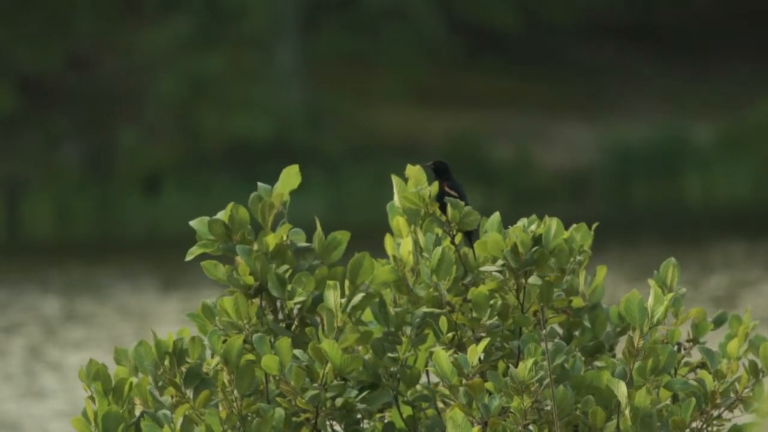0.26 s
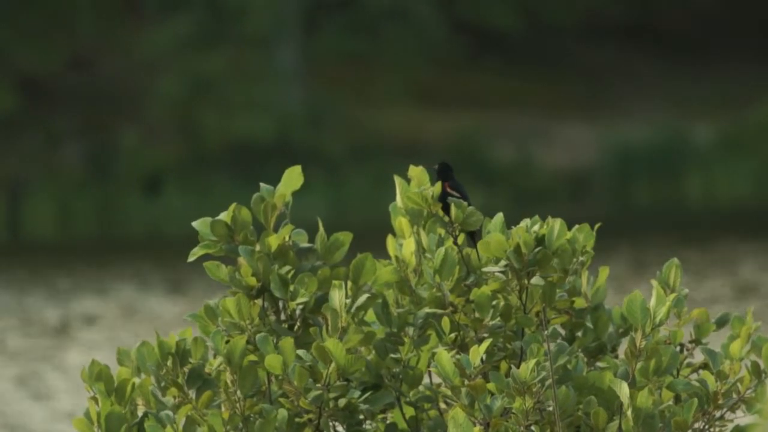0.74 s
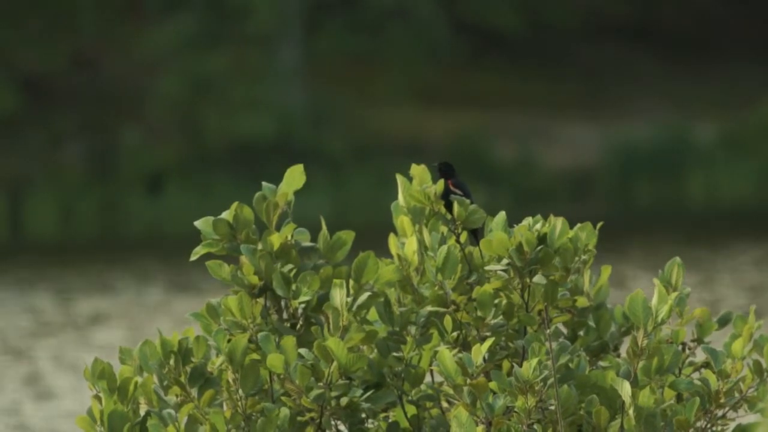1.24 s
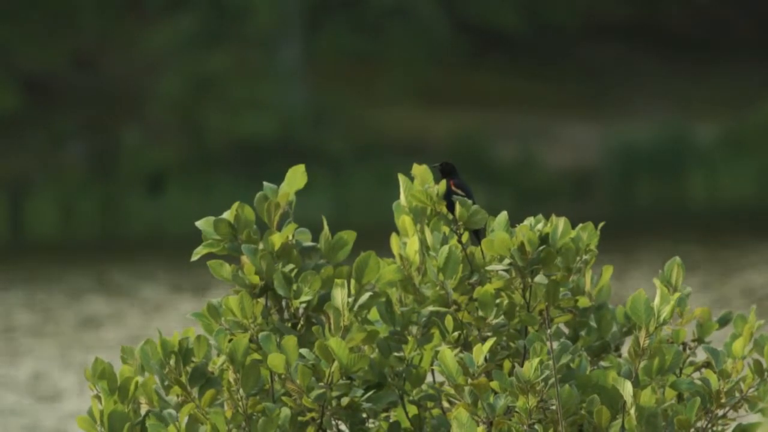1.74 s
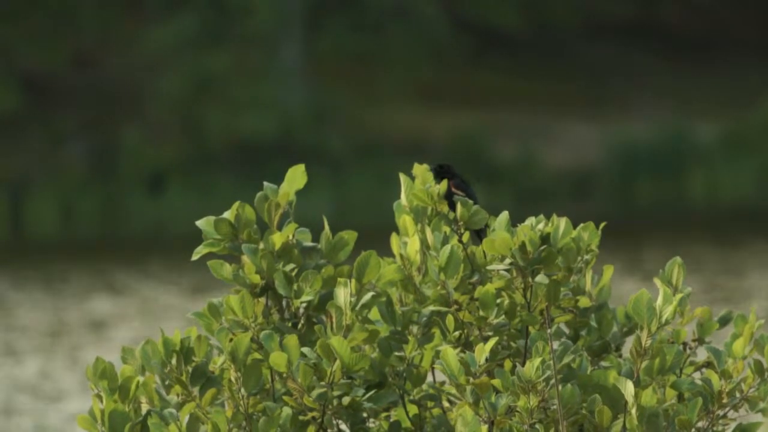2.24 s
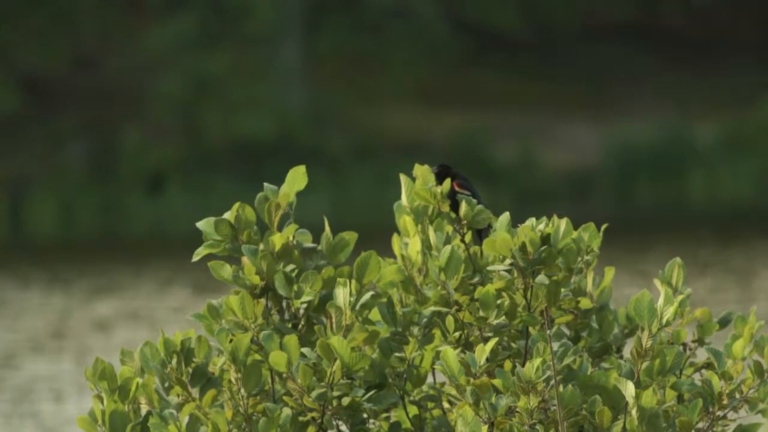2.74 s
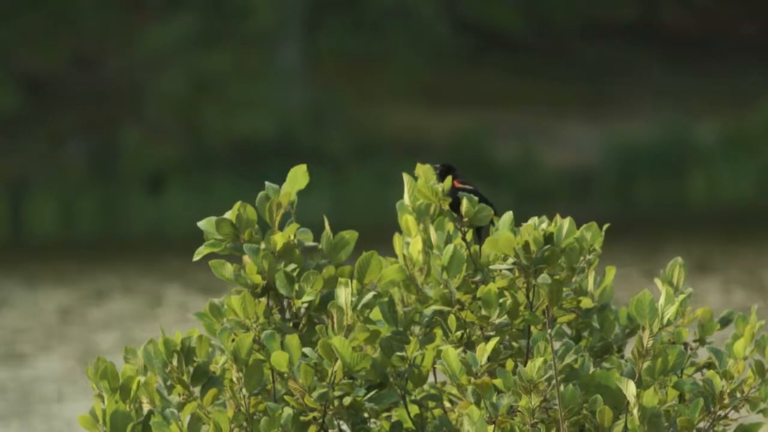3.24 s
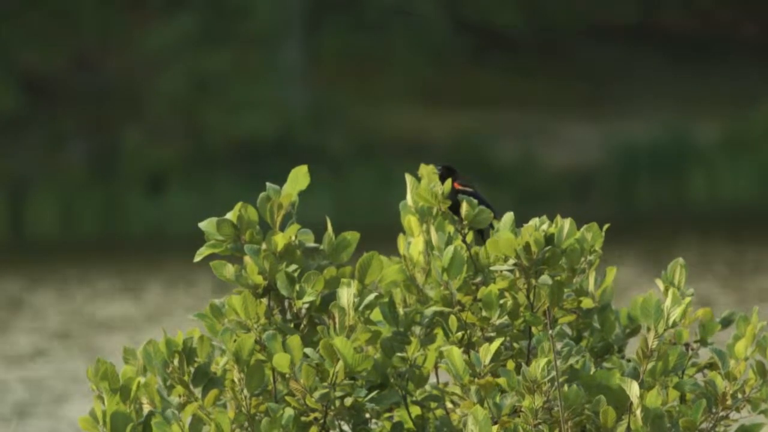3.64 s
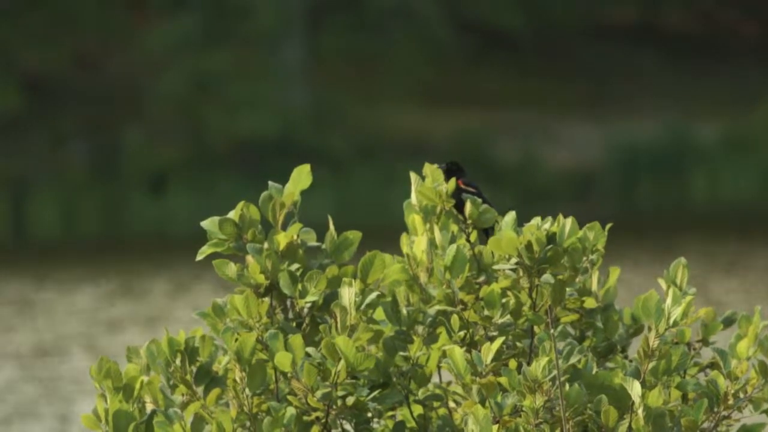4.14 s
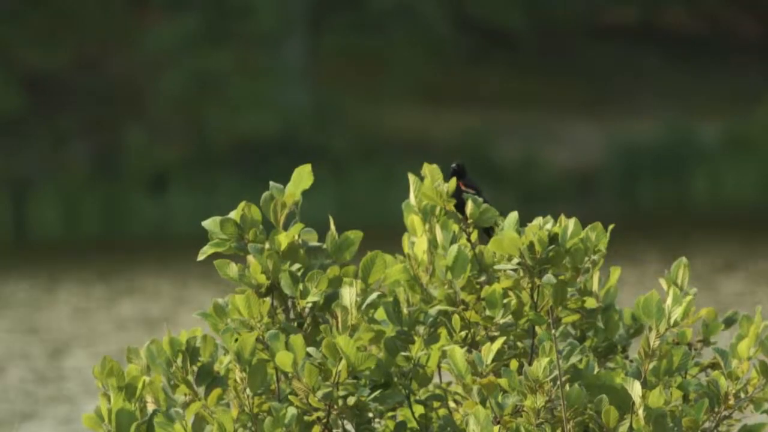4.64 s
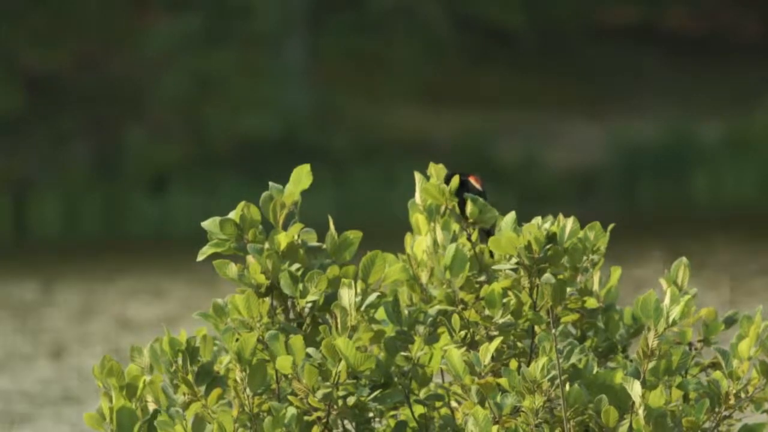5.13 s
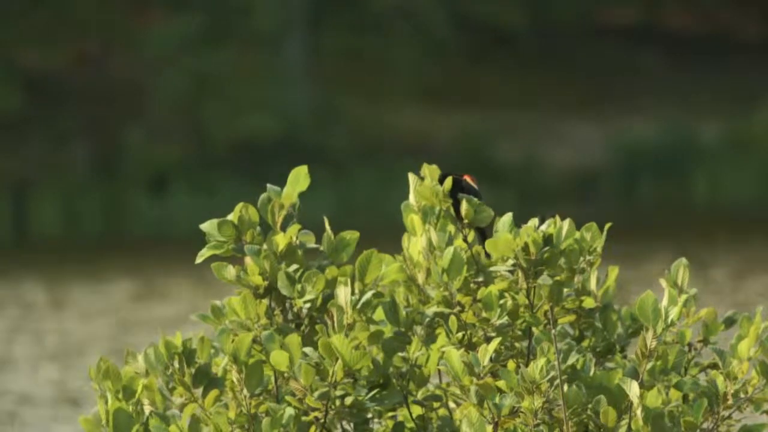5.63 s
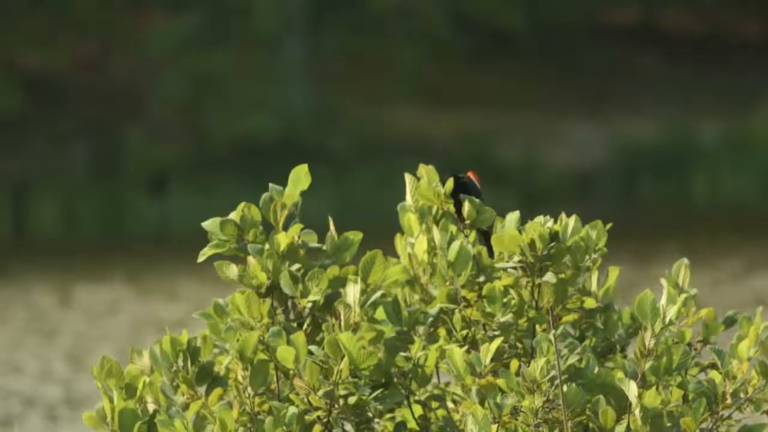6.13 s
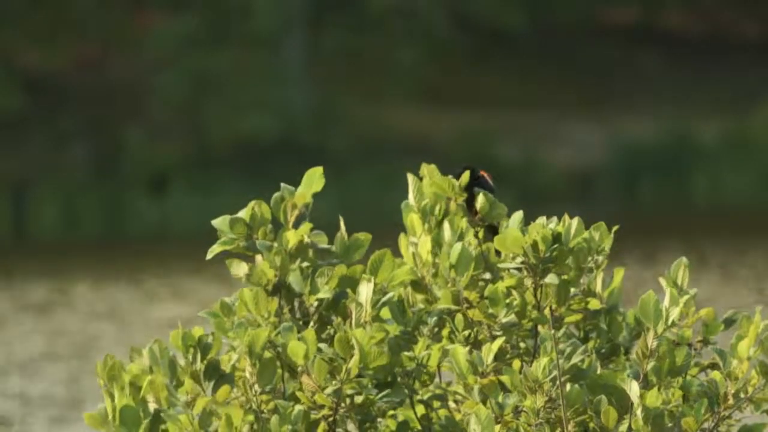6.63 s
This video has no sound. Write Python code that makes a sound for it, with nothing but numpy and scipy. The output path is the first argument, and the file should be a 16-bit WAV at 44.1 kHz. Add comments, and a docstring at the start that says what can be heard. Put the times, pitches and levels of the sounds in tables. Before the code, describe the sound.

A quiet pond with a steady shrill insect haze and a faint engine hum dying away. After a far, blurred rival song, one blackbird in a nearby bush sings low-to-high liquid whistles and leaps into a bright, buzzing trill lasting under a second. Woods and water echo it faintly. Then come low frog gulps, husky distant chips and thin whistles over soft air. The microphone catches the main song centrally, with a faint electronic whine.

```python
"""A red-winged blackbird on a bush by a pond sings a few rising whistles and a long buzzing trill; the far shore echoes.
Its song is a sum of gliding sines with beat-rate modulation of pitch and level, plus filtered noise.
A rival and small birds call in the distance as sines and noise; a frog gulps three times as coloured harmonics.
Insects hiss as shaped noise, and a far engine of low tones and rumble fades away unevenly.
The camera adds a thin whine of steady high tones."""
import sys
import numpy as np
from scipy import signal
from scipy.fft import rfft, irfft, next_fast_len
from scipy.io import wavfile
from scipy.ndimage import map_coordinates

SR = 44100
rng = np.random.default_rng(int(sys.argv[2]) if len(sys.argv) > 2 else 0)


def materialize(psi):
    """Save the field psi as 16-bit PCM at rate SR to the path in sys.argv[1].

    A 1-D psi becomes a single channel; in a 2-D psi each row is a channel.
    """
    bounded = np.clip(np.atleast_2d(psi).T, -1, 1)
    quanta = np.round(bounded * 32767).astype(np.int16)
    wavfile.write(sys.argv[1], SR, quanta)


N = 303441
TIME = np.arange(N) / SR
TRILL_START_S, TRILL_END_S = 3.03, 3.681  # the near bird's trill: first full beat, last sound


def amp(db):
    """Amplitude ratio of a level: a factor of ten for every 20 dB."""
    return 10 ** (np.asarray(db) / 20)


def unit(x):
    """Normalisation to a root mean square of 1."""
    return x / np.sqrt(np.mean(x ** 2) + 1e-20)


def along(points, hz):
    """Interpolation of (f/Hz, value) points on a logarithmic frequency axis."""
    f, v = np.transpose(points)
    return np.interp(np.log(hz + 1), np.log(f + 1), v)


def curves(rows, at=TIME):
    """Linear interpolation over the first column: one curve for each further column."""
    position, *columns = np.transpose(rows)
    return [np.interp(at, position, column) for column in columns]


def gate(start, end, edge):
    """Raised-cosine window: one between start and end, with soft edges."""
    inside = np.minimum(TIME - start, end - TIME)
    return np.sin(np.pi / 2 * np.clip(inside / edge + .5, 0, 1)) ** 2


def wobble(rate):
    """Band-limited random modulation: a spline through random knots, rate of them a second."""
    knots = rng.standard_normal(int(N * rate / SR) + 4)
    coarse = TIME[::8]  # the spline is evaluated at every eighth sample
    return np.interp(TIME, coarse, map_coordinates(knots, [coarse * rate]))


def tone(hz):
    """Frequency modulation: phase is the integral of the pitch curve; a sine of rms 1."""
    return np.sqrt(2) * np.sin(2 * np.pi * (np.cumsum(hz) / SR + rng.random()))


def filtered(x, response):
    """Linear filtering: the spectrum of x times a complex response of frequency."""
    m = next_fast_len(N + SR)
    return irfft(rfft(x, m) * response(np.fft.rfftfreq(m, 1 / SR)), m)[..., :N]


def noise(spectrum):
    """Spectral shaping of white noise to rms 1, silent far outside the given points."""
    closed = [(spectrum[0][0] / 2, -120), *spectrum, (spectrum[-1][0] * 2, -120)]
    return unit(filtered(rng.standard_normal(N), lambda hz: amp(along(closed, hz))))


def diffuse(spectrum):
    """Diffuse field: independent mid and side noises set the left-right coherence at each frequency."""
    # left-right coherence: [f/Hz, correlation]
    coherence = [(60, 0.88), (130, 0.35), (290, 0.3), (640, -0.3), (1410, -0.44), (3100, -0.075),
                 (6820, -0.59), (15000, 0.39)]

    def turn(hz):
        """Mixing angle: half the arc cosine of the coherence."""
        return np.arccos(np.clip(along(coherence, hz), -1, 1)) / 2

    mid = filtered(noise(spectrum), lambda hz: np.cos(turn(hz)))
    side = filtered(noise(spectrum), lambda hz: np.sin(turn(hz)))
    return np.array([mid + side, mid - side]) / np.std(mid)


def placed(x, left_db, lead_ms):
    """Interaural level and time differences, left over right, split evenly between the ears."""
    ears = np.array([[.5], [-.5]])
    return amp(left_db * ears) * filtered(x, lambda hz: np.exp(2j * np.pi * hz * ears * lead_ms / 1000))


def scatter(x, decay, build):
    """Multiple scattering: a decaying noise response, different in each ear, with build-up constant build/s."""
    hz, t, z = signal.stft(rng.standard_normal((2, SR + SR // 2)), SR, nperseg=256)
    fall = amp(-60 * t / along(decay, hz)[:, None])
    rise = 1 - np.exp(-t / build)
    tail = signal.istft(z * fall * rise, SR, nperseg=256)[1]
    return signal.fftconvolve(x[None], tail / np.linalg.norm(tail[0]), axes=1)[:, :N]


def whistles(notes, waver, scoop_s, swell_db_per_s, fade_db, attack_s, release_s, roundness=1.34):
    """Pure-tone glides: each scoops onto its pitch, swells, then fades ever faster and bends away."""
    out = np.zeros(N)
    for start, length, hz, scoop, bend, db, swell_s in notes:
        span = slice(int(start * SR), int((start + length + release_s / 2) * SR))
        t = np.maximum(TIME[span] - start, 0)
        semitones = scoop * np.exp(-t / scoop_s) + bend * np.minimum(t / length, 1) ** 2
        pitch = hz * 2 ** (semitones / 12) * (1 + waver * wobble(180)[span])
        fading = np.maximum(t - swell_s, 0) / max(length - swell_s, release_s)
        level = db - swell_db_per_s * np.maximum(swell_s - t, 0) - fade_db * fading ** roundness
        edges = np.minimum(t / attack_s, 1) * np.clip((length - t) / release_s + .5, 0, 1)
        out[span] += amp(level) * edges * tone(pitch)
    return out


def pond():
    """Superposed diffuse fields: soft air, slow swells of far traffic and two choruses of insects."""
    # outdoor air: [f/Hz, relative level per hertz/dB]
    air_spectrum = [(76, -56), (130, -13), (215, -12), (392, -4), (551, -3.4), (673, -2.5), (1030, -5.5),
                    (2480, -6.5), (3090, -7.5), (4620, -9), (5310, -4.5), (7470, -13.5), (10700, -17.5),
                    (12800, -14.5), (15700, -21)]
    # shrill insects: [f/Hz, relative level per hertz/dB]
    shrill_spectrum = [(4400, -37), (5050, -5.5), (5400, 0.5), (5900, -5.5), (6800, -18)]
    # a lower, fainter insect chorus: [f/Hz, relative level per hertz/dB]
    chirr_spectrum = [(2700, -20), (3000, -9), (3200, -7), (3400, -11), (3800, -25)]
    # traffic swells: [t/s, half width at 1/e of the peak/s, gain before flutter/dB]
    swells = [(1.1, 0.45, -71.5), (6.12, 0.33, -71)]
    traffic_db = -78  # between the swells
    traffic_spectrum = [(150, -15.5), (220, -1.0), (380, 0), (600, -10.5), (1200, -16)]

    air = amp(-59.0) * diffuse(air_spectrum)
    bumps = sum(amp(db) * np.exp(-((TIME - s) / width) ** 2) for s, width, db in swells)
    passing = amp(traffic_db) + bumps
    traffic = passing * amp(0.69 * wobble(5.4)) * diffuse(traffic_spectrum)
    shrill = amp(-65.5 + 1.06 * wobble(25)) * diffuse(shrill_spectrum)
    chirr_db = np.interp(TIME, [1, 5], [-82, -72])  # this chorus grows
    chirr = amp(chirr_db + 1.4 * wobble(7.2)) * diffuse(chirr_spectrum)
    return air + traffic + shrill + chirr


def engine():
    """Engine orders: a firing line and its neighbours at multiples of shaft rate, over slower-fading rumble."""
    # fading of the far engine: [t/s, firing line level/dB]
    line_levels = [(0.0, -58), (0.07, -56), (0.73, -55.5), (2.24, -75), (2.36, -68), (2.91, -85.5),
                   (3.97, -73.5), (4.06, -79), (5.61, -75.5), (6.11, -84), (6.84, -70.5), (6.88, -74)]
    # running speed: [t/s, firing rate f/Hz]
    revs = [(0, 121.3), (.5, 123), (1.5, 120.3), (4, 120.2), (6.88, 118)]
    rumble_db, rumble_follows = -66, 0.47  # gain when the engine is loudest; share of the fading followed
    overtone_db = -81.5
    exhaust = [(25, -26), (55, -20), (72, -22), (86, 2.5), (105, -14), (170, -10), (260, -20)]

    db, = curves(line_levels)
    fading_db = db - db.max()
    hz, = curves(revs)
    shaft = hz * (1 + .012 * wobble(16)) / 3  # the firing line is the third order
    orders = tone(3 * shaft) + amp(-16) * tone(4 * shaft)
    second_order = tone(2 * shaft * (1 + 0.038 * wobble(12)))
    rumble = amp(-3.5) * second_order + amp(0.5) * noise(exhaust)
    overtone = amp(overtone_db + 2.3 * wobble(3)) * tone(2 * hz)  # does not fade
    return amp(db) * orders + amp(rumble_db + rumble_follows * fading_db) * rumble + overtone


def frog(count=18, rough=0.049):
    """Source and filter: each gulp is a harmonic series that drops in pitch, coloured by the throat."""
    # gulps: [t/s, length/s, settled pitch f/Hz, level/dB, t60/s]
    gulps = [(3.837, 0.065, 173.2, -44.5, .16), (4.091, .088, 207.4, -54.5, 0.66),
             (4.346, 0.04, 188, -57.5, 0.35)]
    # throat resonances: [f/Hz, relative level/dB]
    throat = [(180, -25), (350, 1), (530, -2.5), (620, 2.5), (720, -11), (950, -26), (1900, -13),
              (3000, -11), (4000, -48)]
    attack_s = 0.01
    drop, drop_s = 0.151, .008  # share by which the pitch starts too high; its time constant

    out = np.zeros(N)
    for start, length, pitch, db, t60 in gulps:
        span = slice(int(start * SR), int((start + length) * SR))
        t = TIME[span] - start
        hz = pitch * (1 + drop * np.exp(-t / drop_s))
        gain = np.minimum(t / attack_s, amp(-60 * (t - attack_s) / t60))
        k = np.arange(1, count + 1)[:, None]  # harmonic numbers
        cycles = np.cumsum(hz * (1 + rough * wobble(250)[span])) / SR
        phase = 2 * np.pi * (k * cycles + rng.random((count, 1)) / 2)
        voice = unit(np.sum(amp(along(throat, k * hz)) * np.sin(phase), axis=0))
        out[span] += amp(db) * gain * voice * signal.windows.tukey(len(hz), .1)
    return out


def small_birds():
    """Gliding tones: scattered far whistles and, with more random pitch modulation, one row of husky chips."""
    # far whistles: [t/s, length/s, pitch f/Hz, scoop/semitones, bend/semitones, level before distance/dB, swell/s]
    far_calls = [(.9, .062, 10050, -2.5, 0.5, -62, .042), (1.06, .1, 9170, .6, -.6, -67, .005),
                 (1.27, .09, 1820, -0.5, 0.5, -69.5, .04), (2.795, .075, 14000, 0, -.1, -61, .03),
                 (3.53, .1, 9100, 0, 0.5, -69, .04), (5.62, .2, 4350, -3, -1.8, -52.5, 0.17),
                 (5.88, 0.13, 3315, .5, 0, -64, .09), (6.64, .028, 3600, 1, 8.5, -61, .01),
                 (6.677, 0.0154, 3500, 7.5, -2.5, -61.5, .009), (6.69, 0.22, 3687, 1.3, 0.5, -55.5, 0.12)]
    # one bird's row of chips: [t/s, level before distance/dB]
    chip_row = [(4.422, -57), (4.58, -57.5), (4.745, -59), (4.89, -66)]
    chip_hz, chip_s = 3510, .066

    calls = whistles(far_calls, waver=.004, scoop_s=.025, swell_db_per_s=42, fade_db=3,
                     attack_s=0.0085, release_s=.014)
    chips = [(start, chip_s, chip_hz, -.7, 0, db, .025) for start, db in chip_row]
    return calls + whistles(chips, waver=.022, scoop_s=0.0075, swell_db_per_s=40, fade_db=5,
                            attack_s=0.0031, release_s=.012)


def rival(band_hz=2840, beat_hz=48.1, swing=0.021):
    """Joint frequency and amplitude modulation: short notes, then a pulsing line in a blurred buzz."""
    # buzz: [f/Hz, relative level per hertz/dB]
    buzz_spectrum = [(2300, -38), (2650, -3), (2850, -7.5), (3150, -9), (3600, -0.5), (3950, -7),
                     (4350, -16), (5050, -6), (6000, -37)]
    # opening: [t/s, length/s, pitch f/Hz, scoop/semitones, bend/semitones, level before distance/dB, swell/s]
    opening = [(1.62, .04, 2450, 0, .2, -58.5, .025), (1.675, 0.029, 1647, 1.5, -.7, -54, .021),
               (1.718, 0.013, 3590, 0.16, -.25, -52, .012)]
    start_s, end_s, release_s = 1.74, 2.216, 0.074  # its trill
    start_db, fade_db_per_s = -56.5, 7.5  # before distance
    accent_db, accent_s = 4, 0.036  # it starts with a push

    t = np.maximum(TIME - start_s, 0)
    db = start_db - fade_db_per_s * t + accent_db * np.exp(-t / accent_s)
    edges = gate(start_s, TIME[-1], 0.034) * np.exp(-np.maximum(TIME - end_s, 0) / release_s)
    beat = tone(beat_hz * (1 + .05 * wobble(12)))
    pitch = band_hz * (1 + swing * beat + 0.0122 * wobble(300))
    line = tone(pitch) * unit(amp(2.1 * beat))
    buzz = noise(buzz_spectrum) * unit(amp(-1.1 * beat))  # strongest between the line's pulses
    line_gain = amp(np.interp(TIME, [1.8, 2.0], [-6, -2]))
    song = amp(db) * edges * (line_gain * line + amp(-1.0) * buzz)
    return song + whistles(opening, waver=.012, scoop_s=.011, swell_db_per_s=300, fade_db=4,
                           attack_s=0.0038, release_s=.007)


def sizzle(width_hz=1300):
    """Band-limited noise with exponential decay: a few high spits over a steady trace on the trill."""
    # steady trace: [f/Hz, relative level per hertz/dB]
    trace_spectrum = [(10500, -18), (11600, 6), (12500, -6), (14300, -8), (15800, -6)]
    # high spits as the song peaks: [t/s, centre f/Hz, level/dB, t60/s]
    spits = [(2.962, 11500, -51.5, 0.085), (2.99, 11600, -46, 0.12), (3.012, 13300, -45, 0.12),
             (3.02, 14900, -64, 2.2)]

    out = amp(-69) * gate(TRILL_START_S, TRILL_END_S, .02) * noise(trace_spectrum)
    for start, hz, db, t60 in spits:
        band = noise([(hz - width_hz, -22), (hz, 0), (hz + width_hz, -16)])
        decay = amp(db - 60 * np.abs(TIME - start) / t60)
        out = out + decay * gate(start, TRILL_END_S, .015) * band
    return out


def trill(jitter=.0135, flutter=0.028, slip=.018):
    """Periodic modulation: both sides of the syrinx repeat gestures about 46 times a second and beat together."""
    # course of the trill: [t/s, gain on all voices/dB, drive of the upper partials/dB]
    course = [(3.03, -33.5, -16), (3.038, -30, -11.5), (3.07, -32, -8.5), (3.358, -31.5, -13),
              (3.678, -35, -10)]
    # gestures of one beat, for four voices: [share of the beat, multiple of the voice's pitch, relative level/dB]
    arch_shape = [(0, .99, -15), (.14, .99, -5), (.35, 1.015, -3), (.55, 1.005, 0), (0.719, .985, -5),
                  (.86, .975, -5), (1, .99, -26)]
    under_shape = [(0, 1.05, -7), (.12, 1.04, -21), (0.379, 1.03, -13.5), (0.558, 1.02, -3), (.72, 1, -5.5),
                   (.9, .995, -1), (1, 1.05, -5)]
    flick_shape = [(0, 1.25, -13.5), (.07, 1.2, -5.5), (0.201, 1.08, -16.5), (.5, 1.2, -25),
                   (.76, 1.2, -19), (.88, 1.06, -6), (1, 1.25, -17)]
    squeak_shape = [(0, 1.58, 3), (.1, 1.45, 1), (.24, 1.48, -5), (.36, 1.55, -4.5), (.55, 1.55, -15),
                    (.75, 1.46, -15), (.9, 1.57, -10), (1, 1.58, 0.5)]
    # rasp of the lower voice: [f/Hz, relative level per hertz/dB]
    rasp_spectrum = [(1400, -35), (1900, -15.5), (2450, -6.5), (3500, -4.5), (5000, -7.5), (5800, -20),
                     (7000, -39), (8000, -31), (10000, -30)]
    # colour of the whole trill: [f/Hz, gain/dB]
    beak = [(3000, -0.5), (3700, 2.5), (3930, 4), (4100, -2), (4400, -1), (4630, 2.5), (4930, -3.5),
            (5080, 3.5), (5380, -8), (5700, -1)]
    beat_hz, slowing_hz_per_s = 48.05, 5.6  # beat rate at first; the beat slows a little
    upper_hz, lower_hz, sag_hz_per_s = 3314, 2866, 345  # the two voices sink together
    overshoot_hz, settle_s = 103.9, .07  # the upper voice comes out of the leap too high
    rasp_db = -8  # relative to the lower voice's tone

    db, upper_db = curves(course)
    t = TIME - TRILL_START_S
    beats = beat_hz * t - slowing_hz_per_s * t ** 2 / 2
    high_hz = upper_hz - sag_hz_per_s * t + overshoot_hz * np.exp(-np.maximum(t, 0) / settle_s)
    low_hz = lower_hz - sag_hz_per_s * t

    def gesture(hz, shape, unsteady):
        """Quasi-periodicity: pitch and gain of one voice, no two beats quite alike."""
        ratio, level = curves(shape, (beats + slip * wobble(60)) % 1)
        return hz * ratio * (1 + unsteady * wobble(450)), amp(level + 0.86 * wobble(130))

    # the throat favours the second harmonic of the arching voice; the first and third leak through
    pitch, gain = gesture(high_hz, arch_shape, jitter)
    first = amp(-28.5) * tone(pitch / 2)
    third = amp(upper_db - 3.5) * tone(pitch + pitch / 2)
    arch = gain * (tone(pitch) + first + third)
    # the lower voice rasps as it opens
    pitch, gain = gesture(low_hz, under_shape, jitter * 2.19)
    under = gain * (tone(pitch) + amp(rasp_db) * noise(rasp_spectrum))
    pitch, gain = gesture(high_hz, flick_shape, flutter)
    flick = gain * tone(pitch)
    pitch, gain = gesture(high_hz, squeak_shape, flutter * 0.89)
    squeak = gain * amp(upper_db) * tone(pitch)
    voices = gate(3.023, TRILL_END_S, .01) * amp(db) * (arch + under + flick + squeak)
    return filtered(voices, lambda hz: amp(along(beak, hz)))


def blackbird():
    """Superposition: whistles made husky by amplitude modulation, a leap upward, faint sizzle and the trill."""
    # opening whistles, from both sides of the syrinx:
    # [t/s, length/s, pitch f/Hz, scoop/semitones, bend/semitones, level/dB, swell/s]
    opening_notes = [(2.482, .024, 1150, -.7, 1, -56, .016), (2.507, 0.039, 762, 0, 0, -59, .012),
                     (2.543, 0.14, 1518, -0.39, -0.69, -39, 0.03),
                     (2.542, 0.099, 1783, 0, -.55, -50.5, .028), (2.648, 0.039, 1280, 0.11, 1, -56, .022),
                     (2.718, 0.053, 1911, 1, -0.046, -33.5, 0.051),
                     (2.758, 0.017, 2240, -0.12, -1.5, -53, .013),
                     (2.779, .15, 1503, -1.95, -0.0095, -36.5, 0.018),
                     (2.835, 0.12, 1742, -0.035, -.2, -54.5, .028), (2.948, 0.0087, 2330, 0, 0, -38, .005),
                     (2.9565, 0.0086, 2253, .3, -0.12, -27, .005),
                     (2.965, 0.043, 2361, 0.11, 0.21, -23.8, 0.014)]
    # the top note's sharp onset and the leap into the trill:
    # [t/s, length/s, pitch f/Hz, scoop/semitones, bend/semitones, level/dB, swell/s]
    leap_notes = [(2.959, .008, 3100, -3, -1, -54, .004), (3.008, .013, 2550, 0, 10, -39, .009),
                  (3.0195, .011, 5550, -2, -.7, -45, .004)]

    sung = whistles(opening_notes, waver=0.0072, scoop_s=.01, swell_db_per_s=400, fade_db=12.5,
                    attack_s=0.0022, release_s=0.0055)
    leaps = whistles(leap_notes, waver=.035, scoop_s=.003, swell_db_per_s=200, fade_db=3,
                     attack_s=0.0015, release_s=.003)
    husky = sung * (1 + 0.078 * wobble(900))
    return husky + leaps + trill() + sizzle()


def scene():
    """Direct-to-reverberant ratio: the near bird is nearly dry; the far callers, louder at right, echo more."""
    # echoes from the far shore: [delay t/s, level/dB]
    shore = [(0.126, -20), (.78, -34), (.98, -40), (1.07, -40)]
    # decay of the bush: [f/Hz, t60/s]
    bush_decay = [(500, 0.13), (6000, 0.089)]
    # decay of the woods: [f/Hz, t60/s]
    woods_decay = [(300, 0.59), (1500, 1.66), (3000, 0.98), (6000, 1.35), (12000, 0.16)]
    # the near bird through the leaves: [f/Hz, left minus right level/dB]
    side_tilt = [(1500, -5), (1900, 3), (2370, -3), (2800, -4), (3200, -0.5), (3600, -6), (4100, 2.5),
                 (5200, 2)]

    song, answer, gulps = blackbird(), rival(), frog()
    far = small_birds()
    # the echoes come back duller than the song
    dull = filtered(song, lambda hz: amp(along([(2400, 0.5), (3200, -13)], hz)))
    echoes = sum(amp(db) * np.interp(TIME - delay, TIME, dull, left=0) for delay, db in shore)
    bird = placed(song, left_db=0, lead_ms=0.022)
    bird = filtered(bird, lambda hz: amp(np.outer([.5, -.5], along(side_tilt, hz))))
    distant = amp(-4) * placed(answer, left_db=-19.5, lead_ms=0.11)
    distant = distant + amp(-2.5) * placed(far, left_db=-8.0, lead_ms=0.02)
    to_leaves = amp(-10.0) * song + amp(-7.5) * far + amp(-9) * answer
    leaves = scatter(to_leaves, bush_decay, build=0.0028)
    to_woods = amp(-16) * song + amp(-4.5) * far + amp(-9.5) * answer + amp(-5.0) * gulps
    woods = scatter(to_woods, woods_decay, build=0.02)
    low = placed(gulps, left_db=-1, lead_ms=0.11) + placed(engine(), left_db=1.0, lead_ms=-.05)
    return bird + echoes + distant + leaves + woods + low + pond()


def record(dry):
    """Band limitation: the camera's electronics whine faintly, and nothing passes above the cutoff."""
    # whine of the electronics: [f/Hz, level/dB]
    whine_lines = [(9711, -81.5), (12888, -76), (12947, -76), (13006, -80)]
    top_hz = 15800
    whine = sum(amp(db) * tone(hz + 1.46 * wobble(7.4)) for hz, db in whine_lines)
    return filtered(dry + whine, lambda hz: hz < top_hz)


dry = scene()
out = record(dry)
materialize(out)
```